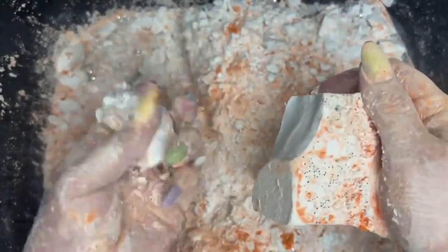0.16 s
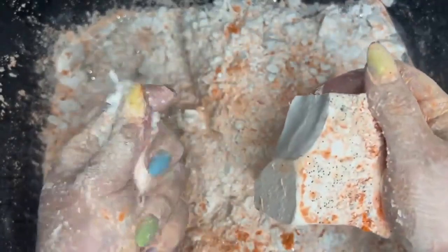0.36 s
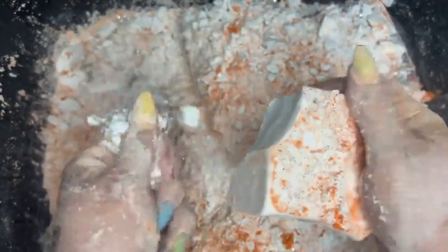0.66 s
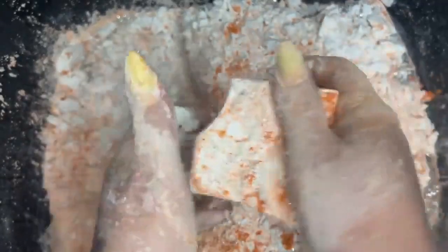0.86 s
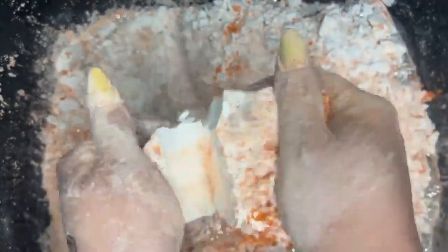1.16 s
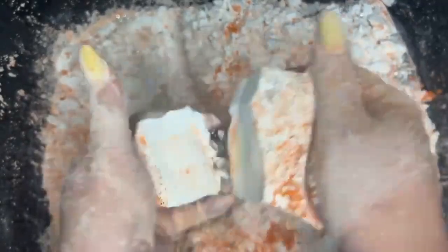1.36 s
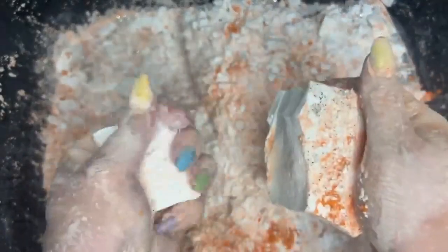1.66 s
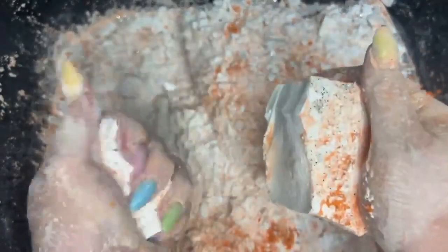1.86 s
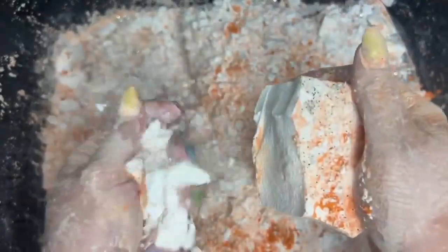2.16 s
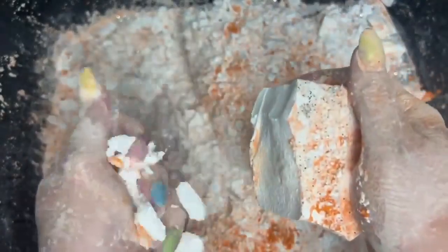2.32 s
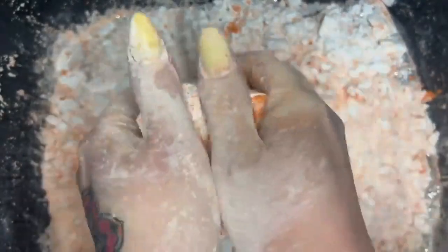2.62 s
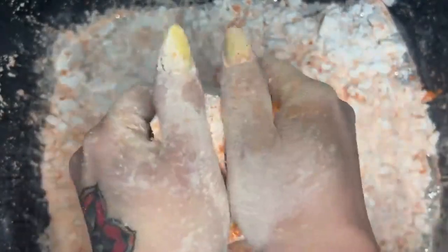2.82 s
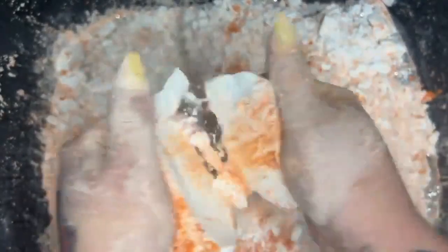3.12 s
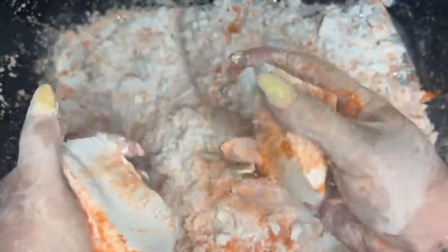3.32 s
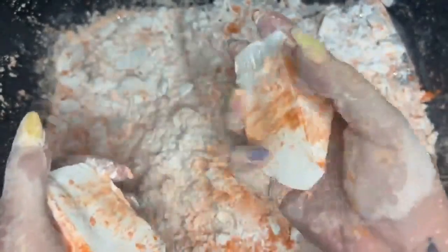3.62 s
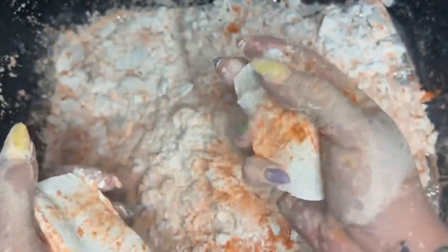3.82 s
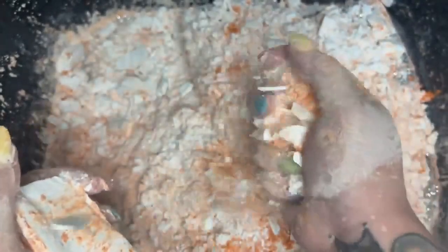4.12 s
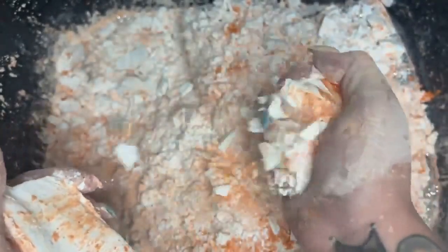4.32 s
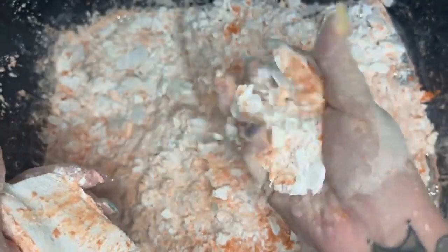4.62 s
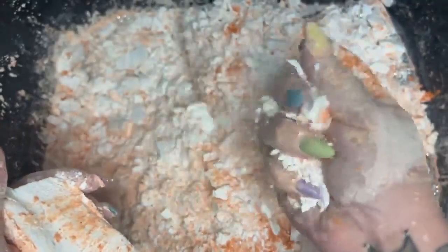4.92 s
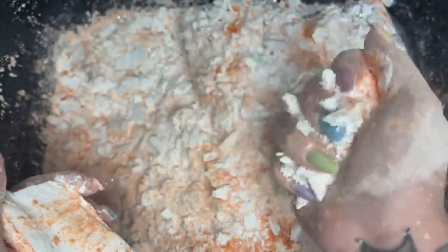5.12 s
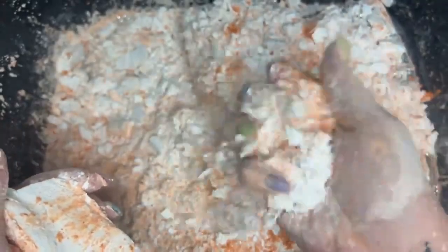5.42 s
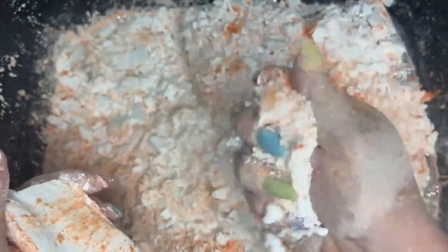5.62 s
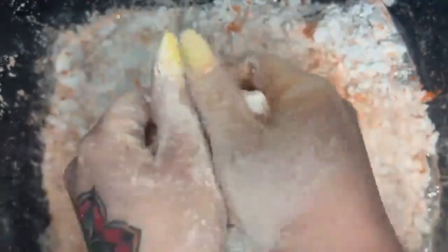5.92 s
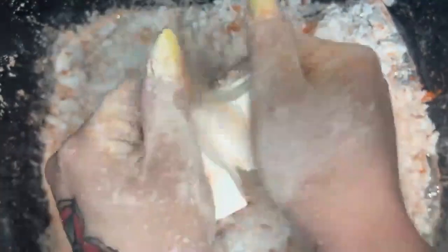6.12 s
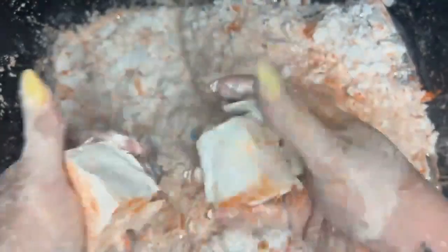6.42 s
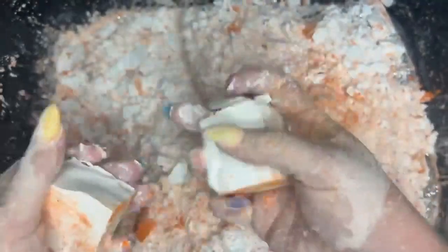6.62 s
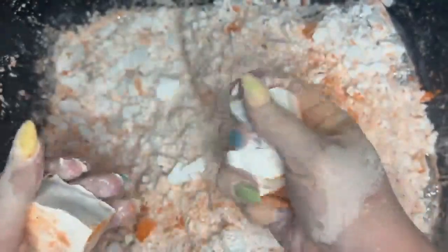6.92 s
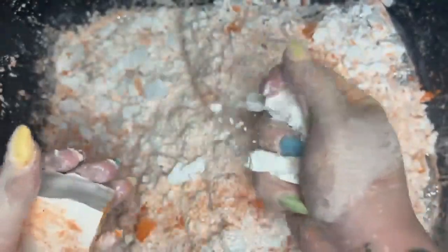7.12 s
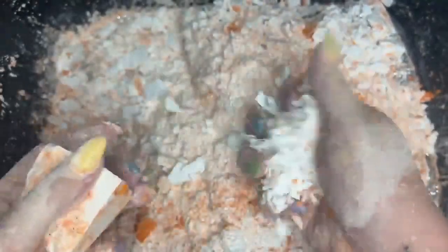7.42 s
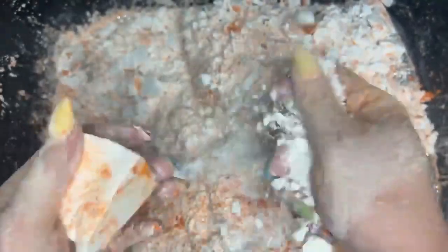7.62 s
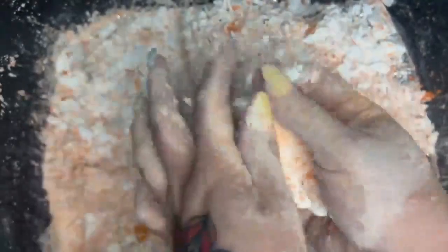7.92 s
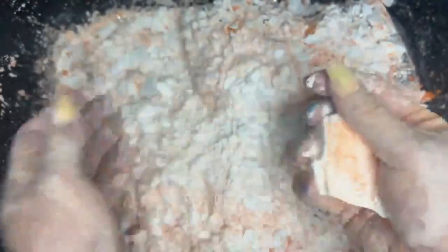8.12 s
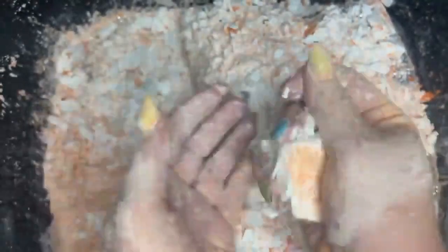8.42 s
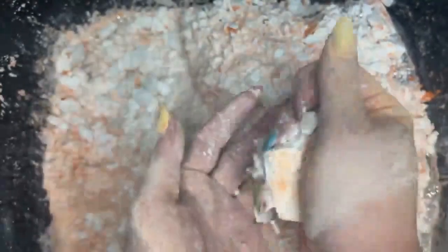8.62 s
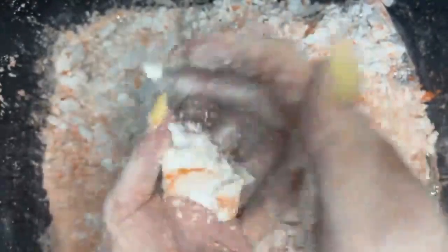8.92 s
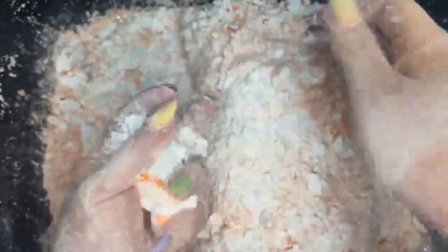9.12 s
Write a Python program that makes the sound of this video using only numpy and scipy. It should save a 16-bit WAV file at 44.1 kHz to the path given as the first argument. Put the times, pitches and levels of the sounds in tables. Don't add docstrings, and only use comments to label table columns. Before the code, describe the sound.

Close stereo pickup in a small indoor room with a low steady fan drone and little high treble. Chalk-like lumps crack apart over a shallow tray: first scattered snaps, then a hard loud break, quieter rubbing, a dense crushing run, later another cluster of crunches, a final sharp snap and fine crackling. Dry crumbs rustle and trickle after each break; faint creaks precede two of them.

```python
import sys
import numpy as np
from scipy import signal
from scipy.fft import rfft, irfft, next_fast_len
from scipy.io import wavfile
from scipy.ndimage import uniform_filter1d

SR = 44100
rng = np.random.default_rng(int(sys.argv[2]) if len(sys.argv) > 2 else 0)


def boost(x):
    u = np.asarray(x, float) / 20
    return 10 ** u


def dump_mix(stems):
    frames = np.atleast_2d(stems).T
    limited = np.clip(frames, -1, 1)
    pcm = np.round(limited * 32767).astype(np.int16)
    wavfile.write(sys.argv[1], SR, pcm)


N = 408366
MID_SIDE = np.array([[1], [-1]])


def level(x, db):
    return x * boost(db) / np.sqrt(np.mean(x ** 2))


def on_log(hz, points):
    f, db = np.transpose(points)
    return np.interp(np.log(np.maximum(hz, 1)), np.log(f), db)


def shape(x, db_of_hz):
    size = next_fast_len(N)
    hz = np.arange(size // 2 + 1) * SR / size
    return irfft(rfft(x, size) * boost(db_of_hz(hz)), size)[..., :N]


def ring(x, hz, t60):
    pole = np.exp(2j * np.pi * hz / SR - np.log(1000) / (t60 * SR))
    return signal.lfilter([1], [1, -pole], x).imag


def band(low_hz, high_hz):
    return signal.butter(2, [low_hz, high_hz], "bandpass", fs=SR, output="sos")


def unit(x):
    return x / np.abs(x).max()


def walk(rate):
    k = int(SR / rate)
    held = np.repeat(rng.standard_normal(N // k + 1), k)
    return 1.3 * uniform_filter1d(uniform_filter1d(held, k), k)[:N]


def add(out, s, left, right, pan_db):
    i = int(s * SR)
    n = min(len(left), N - i)
    out[:, i:i + n] += np.array([left[:n] * boost(pan_db / 2), right[:n] * boost(-pan_db / 2)])


# frequency in Hz, density in dB per Hz.
FAN = [(15, -59), (25, -30.5), (40, -16), (76, -7.5), (135, -2.5), (224, -16), (319, -12), (390, -17),
       (584, -22), (732, -29), (1180, -38), (3000, -39), (4610, -60.5), (8230, -58.5), (9340, -73),
       (10300, -96.5), (13400, -116), (22000, -120)]
# frequency in Hz, side minus mid in dB.
FAN_SIDE = [(60, -21), (190, -34), (340, -11), (500, -1), (1000, -1.5), (1800, -12), (5600, 5)]
# frequency in Hz, width in Hz, lift in dB.
ROOM_MODES = [(129.7, 12.7, 11.5), (179.8, 11, 8), (232, 16, 10), (299, 27, 5), (342, 14.6, 6),
              (930, 153, 6)]


def fan():
    def colour(f):
        lift = sum(db / (1 + (2 * (f - hz) / width) ** 2) for hz, width, db in ROOM_MODES)
        return on_log(f, FAN) + lift
    mid = shape(rng.standard_normal(N), colour)
    side = shape(rng.standard_normal(N), lambda f: colour(f) + on_log(f, FAN_SIDE))
    return level(mid + side * MID_SIDE, -38) * boost(0.5 * walk(6))


# time of the peak in seconds,
# coarse crumbs in dB, fine dust in dB, time to fade 20 dB in seconds (below 0.01 counts as 0.01).
RUBS = [(.2, -53.5, -53.5, 0.45), (.5, -69, -65, 0.2), (1.3, -78, -66, 0.36), (1.638, -50.5, -51, 0.28),
        (1.95, -44, -56, -0.2), (2.17, -61, -57, 0.8), (2.679, -51, -59, 0.2), (3.099, -53, -56.5, -1.94),
        (3.37, -83, -61, 0.8), (3.55, -74, -59, -0.4), (3.852, -33, -50, -0.51), (4.048, -48.5, -50, 0.18),
        (4.361, -47, -54, -1.3), (4.642, -53, -57, 0.45), (5.09, -57.5, -62.5, 0.5),
        (5.37, -52.5, -62, -1.07), (5.66, -56.5, -70.5, 0.2), (6.25, -68.5, -65, 1.1), (6.5, -50.5, -52, 0),
        (6.621, -53, -51, -0.3), (6.9, -48, -53.5, 0.37), (7.08, -55.5, -55, 0.12),
        (7.527, -53.5, -57.5, 0.65), (7.899, -50.5, -56.5, -0.04), (8.15, -74, -62.5, 0.5),
        (8.7, -69, -61, 0.5), (9.12, -54, -55, 0.96),
        (.82, -65, -59.5, .05), (1.545, -38, -43.5, 0.05), (1.625, -45, -54, 0.0549),
          (2.62, -52, -58.5, 0.09), (2.769, -42, -51, 0), (3.086, -66, -55, -0.15), (3.19, -68, -59, -0.2),
          (3.42, -69, -65, -0.1), (3.914, -36, -38.5, 0.07), (4.62, -58, -56, 0.23),
          (5.958, -38, -42, 0.0368), (6.0, -49, -67, 0.15), (.365, -49, -47, 0.06),
          (0.901, -52.5, -61, 0.07), (1.675, -47, -46, 0.0249), (2.2, -54, -54.5, 0.06),
          (6.795, -38.5, -42, 0.103), (6.82, -41, -53, 0.07), (6.904, -45, -32, 0.0669),
          (7.03, -51, -57, 0.13), (7.879, -47.5, -43, -0.07), (7.95, -53, -54, -0.3),
          (8.029, -50.5, -55, -0.25), (8.16, -50.5, -56.5, 0.07), (8.32, -42.5, -50, 0.11),
          (9.1, -45, -59, -0.13)]
RUB_ONSET_SHARE = 0.76
REST_DB, REST_DUST_DB = -68.5, -79.5
SPILL_DB, SPILL_DUST_DB = -36.5, -37
SPILL_RISE_S, SPILL_T60_S = .005, 0.25


def rustle():
    t = np.arange(0, N, 32) / SR
    power = boost(2 * np.array([[REST_DB], [REST_DUST_DB]])) + 0 * t
    for s, coarse_db, dust_db, fade in RUBS:
        away = np.where(t < s, (s - t) / RUB_ONSET_SHARE, t - s) / max(fade, .01)
        power = power + boost(2 * (np.array([[coarse_db], [dust_db]]) - 20 * away))
    for s, db, *_ in EARLY_BREAKS + LATE_BREAKS:
        fall_db = np.where(t < s, -20 * (s - t) / SPILL_RISE_S, -60 * (t - s) / SPILL_T60_S)
        power = power + boost(2 * (db + np.array([[SPILL_DB], [SPILL_DUST_DB]]) + fall_db))
    return t, 10 * np.log10(power)


# frequency in Hz, density in dB per Hz.
CRUMB_COLOUR = [(290, -27), (500, -14.5), (560, -15), (620, -10.5), (1410, -5.5), (1920, -4.5), (3520, -7),
                (9100, -12.5), (10300, -43), (13400, -58.5), (22000, -120)]
CHIPS_PER_S, CHIP_SCATTER_DB, CHIP_CYCLES = 70, 5.0, 12


def chips():
    out = 0
    for hz in np.geomspace(900, 9000, num=11):
        sizes = boost(np.minimum(CHIP_SCATTER_DB * rng.exponential(size=N), 18))
        hits = (rng.random(N) < CHIPS_PER_S / SR) * sizes
        t60 = CHIP_CYCLES / hz
        rung = ring(ring(hits, hz, t60), hz * 1.013, t60)
        out = out + level(rung, on_log(hz, CRUMB_COLOUR) + 10 * np.log10(hz))
    return out * np.array([[1], [.5]])


CHIP_DB = 0.5
CHIPS_FROM_DB, CHIPS_FULL_DB = -64, -53


def crumbs():
    s, columns = rustle()
    out, snaps = 0, chips()
    for db, kind, apart in zip(columns, ("low", "high"), (.3, .5)):
        sizes = boost(np.minimum(4.5 * rng.exponential(size=N), 17)) * (rng.random(N) < .01)
        flurries = boost(2.4 * walk(120) + 2.2 * walk(25) + 1.5 * walk(8))
        grains = (sizes + 1.0) * flurries * rng.standard_normal((2, N))
        grains = shape(grains, lambda f: on_log(f, CRUMB_COLOUR))
        db = np.interp(np.arange(N) / SR, s, db)
        busy = np.clip((db - CHIPS_FROM_DB) / (CHIPS_FULL_DB - CHIPS_FROM_DB), 0, 1)
        split = signal.butter(3, 4600, kind, fs=SR, output="sos")
        rubbed = level(signal.sosfilt(split, grains), 0)
        snapped = level(signal.sosfilt(split, snaps), CHIP_DB)
        mid, side = rubbed + busy * snapped
        out = out + boost(db - 5.0) * (mid + apart * side * MID_SIDE)
    return out


HOLE_AFTER_S, HOLE_HALF_S, HOLE_DB = .009, 0.0037, -13


def patchy_treble(x):
    f, t, z = signal.stft(x, SR, nperseg=512)
    treble = f[:, None] > 4000
    bands, frames = np.arange(len(f)) // 3, np.arange(len(t)) // 6
    luck = rng.standard_normal((bands[-1] + 1, frames[-1] + 1))
    luck = uniform_filter1d(luck, size=2) * 1.4
    patch_db = np.where(luck < -1.2, -16, 1.8 * luck)[np.ix_(bands, frames)] * treble
    loud_s = np.array([row[0] for row in EARLY_BREAKS + LATE_BREAKS if row[1] > -15])
    holes = (np.abs(t[:, None] - loud_s - HOLE_AFTER_S) < HOLE_HALF_S).any(axis=1)
    patch_db = patch_db + HOLE_DB * holes * treble
    edge_hz = 9650 + 300 * luck[0, frames]
    gain = boost(patch_db - 35 * (f[:, None] > edge_hz))
    return signal.istft(z * gain, SR, nperseg=512)[1][:, :N]


# start in seconds, end in seconds, first slips per second, last slips per second,
# ring in Hz, level in dB, gap between the two modes as a share.
CREAKS = [
    (0.139, 0.229, 420, 900, 2560, -50, .06),
    (4.085, 4.157, 290, 360, 3150, -45.5, 0.32),
]


def creaks():
    out = np.zeros((2, N))
    for s0, s1, rate0, rate1, hz, db, gap in CREAKS:
        u = np.linspace(0, 1, int((s1 - s0) * SR))
        jitter, size = rng.standard_normal((2, len(u)))
        rate = (rate0 + (rate1 - rate0) * u) * (1 + .5 * uniform_filter1d(jitter, 60))
        phase = np.cumsum(rate) / SR
        slips = np.diff(np.floor(phase), prepend=0) * boost(2.8 * size) + 0.039 * jitter
        slips = slips * np.sin(np.pi * u ** 2.0) ** 0.165
        lower = ring(slips, hz * (1 - gap / 2), 0.0035)
        squeak = level(ring(lower, hz * (1 + gap / 2), 0.0053), db)
        add(out, s0, squeak, squeak, 0)
    return out


# start in seconds, peak in dB, ring in Hz, 60 dB decay in ms.
THUMPS = [(0.2199, -30, 930, 17), (0.97, -15, 947, 23), (0.9722, -13, 376, 14), (1.524, -25.5, 730, 22),
          (2.7263, -10, 346, 19.4), (3.8457, -29.5, 336, 45), (3.857, -22.5, 930, 20),
          (4.1602, -36.5, 820, 9.6), (5.9531, -20.5, 368, 32), (5.9711, -15.5, 753, 12),
          (5.9735, -20.5, 377, 26), (6.7332, -20.5, 1010, 15), (6.7355, -33.5, 342, 15),
          (6.7616, -28, 314, 16), (7.62, -30.5, 1050, 18), (8.295, -27, 730, 8.3)]


def thumps():
    out, push = np.zeros((2, N)), np.r_[np.hanning(60), np.zeros(3000)]
    tray = signal.butter(2, 120, "high", fs=SR, output="sos")
    for s, db, hz, t60_ms in THUMPS:
        rung = ring(push, hz, max(t60_ms, 4) / 1000)
        thud = boost(db) * unit(signal.sosfilt(tray, rung))
        add(out, s, thud, thud, 0)
    return out


TICKS_PER_S, TICK_BUSY_DB = 25, -49.5
TICK_OVER_DB, TICK_SCATTER_DB, TICK_HZ = 12, 3, 2500


def ticks():
    t, (coarse_db, _) = rustle()
    count = int(TICKS_PER_S * N / SR)
    when, keep = rng.random((2, count))
    size, pitch, bright = rng.standard_normal((3, count))
    s = when * (N / SR - .05) + .02
    busy_db = np.interp(s, t, coarse_db)
    db = np.minimum(busy_db, -46) + TICK_OVER_DB + TICK_SCATTER_DB * size
    hz = np.clip(TICK_HZ * np.exp(.3 * pitch), 800, 4400)
    rows = np.transpose([s, db, hz, -6 + 6 * bright])
    return [tuple(row) for row in rows[keep < boost(busy_db - TICK_BUSY_DB)][:70]]


# time in seconds, peak in dB, ring in Hz, # treble over the ring in dB, fall
# in ms.
EARLY_BREAKS = [(0.2205, -14, 2160, -18, 0.18), (0.4355, -15, 2450, -26, 0.87),
                (0.9699, -9.5, 1910, -45, 0.7), (0.993, -19, 1860, -32, 0.26),
                (1.5224, -1.5, 2630, -22, 0.86), (1.5562, -14, 2800, 7, 0.48),
                (1.5915, -21.5, 2500, -33, 1.6), (1.6673, -23.5, 2580, -14, 0.061),
                (2.7241, -13, 1690, 0, 3.5), (2.7658, -18, 2380, -12, 1.1), (3.8409, -20, 1094, 5, 1.76),
                (3.8581, -14, 2570, 4.5, 1.5), (3.8936, -8.5, 1640, 3, 0.89), (3.906, -12, 2290, -1.5, 2.6),
                (3.9243, -22.5, 3760, -27, 0.61), (3.958, -14.5, 3380, -45.5, 0.26),
                (4.1596, -13, 1680, 0, 1), (4.2796, -22, 2100, -46, 0.18), (4.9004, -20, 2040, -19, 0.2),
                (5.535, -9.5, 1750, 1.5, 0.53), (5.6351, -20, 1680, -34, 1.4)]
# time in seconds, peak in dB, ring in Hz, # treble
# over the ring in dB, fall in ms.
LATE_BREAKS = [(5.9506, -21, 1480, -11, 9.5), (5.9547, -23, 2390, 13.5, 3.5),
               (5.9604, -10.5, 2700, -21, 1.4), (5.9718, -6, 1990, -1, 4.1), (6.7325, -9.5, 2500, 0, 0.78),
               (6.7455, -28, 2860, 3, 2.8), (6.762, -13.5, 2580, -6, 0.9), (6.7733, -8.5, 3040, -38, 0.82),
               (6.7954, -16.5, 4100, -7, 3.2), (6.802, -17, 3860, -19, 2.1),
               (6.833, -18.5, 3080, -33, 1.1), (6.8978, -22, 2700, 2.5, 1.5),
               (6.9065, -12.5, 3900, -15, 0.9), (6.931, -20, 2960, 0, 0.92), (7.0014, -26, 1050, 2, 2.8),
               (7.0255, -18.5, 1530, 5, 1.6), (8.1502, -22.5, 3630, 3, 4.9), (8.2944, 1, 3560, -31, 0.77)]
# time in seconds, peak in dB, ring in
# Hz, treble over the ring in dB.
CRACKLES = [(0.229, -31, 2200, -29), (0.2593, -33, 2220, 3), (0.3092, -35, 2000, -7),
            (0.3526, -31.5, 1960, -20.5), (0.3655, -34, 1070, 5), (0.4839, -40, 1360, 1),
            (0.52, -34.5, 1370, 3), (0.9457, -37, 2000, -9), (1.4141, -35, 2230, 14),
            (1.539, -26.5, 4300, -1), (1.548, -28, 4300, 2), (1.602, -28.5, 2170, 8),
            (1.6206, -31.5, 1478, -11), (1.69, -32, 2630, 6), (1.9047, -41.5, 2130, -27),
            (1.9396, -41.5, 2800, 8), (1.999, -41, 2630, 7.5), (2.123, -23.5, 3040, 6.5),
            (2.1749, -31, 3960, -24), (2.1928, -37, 2760, -13), (2.2192, -41.5, 1140, 13.5),
            (2.428, -32, 1330, -2), (2.644, -44, 1980, 2.5), (2.7813, -32.5, 1360, -21),
            (2.821, -31, 2470, -26.5), (2.942, -50, 4200, -4), (3.675, -41, 4100, -8),
            (1.6606, -35.5, 3680, 18), (1.677, -37.5, 4390, 18), (2.299, -58, 4000, 7),
            (3.801, -27, 1540, 3), (3.83, -25, 3700, 6), (3.972, -25, 3190, -21),
                  (4.02, -30.5, 3730, 0), (4.041, -41, 2630, -27), (4.1677, -26.5, 2400, 6.5),
                  (4.5968, -30, 2620, -8), (4.6344, -23.5, 3300, 5), (4.678, -33, 3010, -19),
                  (4.693, -23, 890, -4.5), (4.7234, -35, 2500, -1), (4.8067, -34, 1480, 3),
                  (4.9361, -33.5, 1750, -19), (4.9681, -28, 2410, -22), (5.082, -30.5, 1690, 2.5),
                  (5.6736, -36, 1420, -31), (5.78, -37, 1860, -37), (6.571, -42, 2540, -26),
                  (6.612, -28.5, 2180, -27), (6.652, -39, 820, 7.5), (6.6911, -24, 2690, -22),
                  (6.8158, -27, 2430, -14), (6.8531, -29, 1290, -13), (6.8798, -25, 3000, -19),
                  (6.9362, -18.5, 2680, -23), (7.0586, -25.5, 4050, 3), (7.078, -23.5, 2900, 0),
                  (7.1326, -36, 3680, 4), (7.145, -32.5, 2140, 4), (7.169, -38, 2430, -13),
            (7.4199, -34.5, 3360, 1), (7.544, -33, 3270, -12), (7.621, -39, 1010, -17.5),
                 (7.889, -38, 2200, 4), (7.9158, -33, 3000, -9), (7.942, -38, 2300, 5.5),
                 (8.0339, -32.5, 3840, 1), (8.064, -39, 3270, 4.5), (8.125, -49, 4000, 8),
                 (8.245, -43, 4000, 3), (8.231, -34, 3060, -2), (8.2625, -31.5, 3000, 5.5),
                 (8.3346, -25.5, 1490, -11), (8.345, -31, 3600, -13), (8.3925, -32.5, 1420, -5),
                 (8.4192, -32.5, 2530, 4.5), (8.498, -33.5, 2620, -32), (8.69, -40, 1430, 4.5),
                 (8.786, -35, 4150, 8), (8.9658, -27.5, 2390, 1), (9.017, -30, 1050, 3),
                 (9.0523, -39, 2460, -4), (9.081, -23, 2430, 6), (9.101, -32, 1040, 8.5),
                 (9.124, -28.5, 3700, 5.5), (9.135, -30, 2430, 6), (9.15, -36, 2200, 2),
                 (9.009, -30.5, 2000, -6), (7.269, -43, 2350, -13), (8.369, -36, 4400, 9),
                 (9.18, -36, 1320, -1), (9.2506, -22.5, 2820, -17),
            (0.1108, -44.5, 2290, -10), (0.855, -56, 2490, -15), (0.8665, -46, 2500, -12),
               (1.48, -41, 2060, 5), (1.5259, -22.5, 2500, 10.5), (1.536, -25, 3300, -20),
               (1.5665, -25, 3600, -25), (1.618, -24.5, 3000, 0), (2.097, -38, 1360, -1),
               (2.705, -37.5, 3000, -7), (2.762, -24, 3000, -2), (2.773, -32.5, 2400, 8),
               (2.991, -46, 1420, -7), (3.032, -42.5, 1100, -22), (3.182, -45.5, 1950, 5),
               (3.8915, -10.5, 1500, 1), (3.9202, -24.5, 4400, 10.5), (3.935, -33, 4000, 5.5),
               (4.0694, -40, 3470, -5), (4.5655, -50, 2000, -25), (4.587, -42, 2500, -13),
               (4.612, -32.5, 2500, 2), (4.624, -38, 2000, -13), (4.668, -36.5, 3000, -8),
               (4.706, -37, 4400, 13), (4.759, -41, 3500, -6), (4.773, -40, 2500, -3),
               (4.824, -38.5, 1400, 5), (4.8704, -37, 1500, -15), (4.9224, -33, 2500, 2),
               (5.0247, -39, 1560, -10.5), (5.5197, -44.5, 2180, -10), (5.73, -43, 2020, -13),
               (5.9343, -48, 1990, -17), (6.298, -42.5, 2000, 0), (6.588, -41, 1470, -4),
               (6.7846, -26.5, 2800, -12), (6.8145, -30, 3000, -9), (6.862, -29, 2500, -1),
               (6.911, -20, 3000, -10), (6.916, -28, 1600, -15), (7.375, -39.5, 2230, -5),
               (7.5916, -41, 2760, -8), (7.638, -40, 2360, -4.5), (8.0216, -39, 2010, -1),
               (8.2929, -6.5, 2650, -25), (8.304, -19.5, 3000, -10), (8.84, -46, 2250, 3),
               (8.9343, -50, 1500, 0), (9.231, -42, 1430, 6)]
BREAK_RISE_MS, CRACKLE_RISE_MS, CRACKLE_FALL_MS = 0.67, 1, 1.29
LEAD_S = .006


def cracks():
    out, t = np.zeros((2, N)), np.arange(1300) / SR - LEAD_S
    crackles = CRACKLES + ticks()
    rows = [(*row[:4], BREAK_RISE_MS, row[4]) for row in EARLY_BREAKS + LATE_BREAKS]
    rows += [(*row, CRACKLE_RISE_MS, CRACKLE_FALL_MS) for row in crackles]
    snap_band, grit_band, knock_band = band(1300, 4700), band(4400, 7600), band(800, 2500)
    small = signal.butter(2, 700, "high", fs=SR, output="sos")
    for s, db, hz, treble_db, rise_ms, fall_ms in rows:
        sign_noise, size_noise, side_snap, side_grit, pan = rng.standard_normal((5, len(t)))
        scale_ms = np.maximum(np.where(t < 0, 1.03 * rise_ms, 0.99 * fall_ms), .1)
        run = np.exp(-1000 * np.abs(t) / scale_ms)
        run = run + 0.18 * np.exp(-(t / np.where(t < 0, .0025, .006)) ** 2)
        slips = run * sign_noise * np.abs(size_noise) ** 0.47
        slips[int(LEAD_S * SR)] = -7.5
        body = unit(ring(slips, hz, 4.25 / hz))
        body = body + 0.79 * unit(signal.sosfilt(snap_band, slips))
        body = body + 0.11 * unit(ring(slips, hz * 0.37, 3.1 / hz))
        body = body + 0.2 * unit(signal.sosfilt(knock_band, slips))
        dull = signal.butter(2, min(2.8 * hz, 9000), fs=SR, output="sos")
        grit = unit(signal.sosfilt(grit_band, slips))
        mid = unit(signal.sosfilt(np.r_[small, dull], body)) + boost(treble_db - 4.5) * grit
        side = 0.16 * unit(signal.sosfilt(snap_band, run * side_snap))
        side = side + 0.2 * boost(treble_db) * unit(signal.sosfilt(grit_band, run * side_grit))
        add(out, s - LEAD_S, boost(db) * (mid + side), boost(db) * (mid - side), 1.2 * pan[0])
    return out


def scene():
    return patchy_treble(fan() + crumbs()) + creaks() + thumps() + cracks()


def roll_off(x):
    return signal.sosfilt(signal.butter(12, 10480, fs=SR, output="sos"), x)


# time in seconds, fade out in seconds, fade in in seconds, depth in
# dB.
DIPS = [
    (.606, 0.033, 0.036, -48),
    (2.474, 0.019, 0.027, -15),
    (5.876, 0.031, 0.04, -24),
    (7.843, 0.036, 0.032, -17),
]
# frequency in Hz, left minus right in dB.
PORT_LEAN = [(210, 0.72), (340, 4), (620, 2.5), (820, 0), (2000, -0.5)]
TOP_HZ = 9680


def record(dry):
    t, gain = np.arange(N) / SR, 1
    for s, fall, rise, depth_db in DIPS:
        gain = gain * np.clip(np.maximum((s - t) / fall, (t - s) / rise), boost(depth_db), 1)
    ports = shape(dry * gain, lambda f: MID_SIDE * on_log(f, PORT_LEAN) / 2)
    top_cut = signal.ellip(6, .5, 50, TOP_HZ, fs=SR, output="sos")
    return roll_off(np.tanh(signal.sosfilt(top_cut, ports)))


dry = scene()
out = record(dry)
dump_mix(out)
```